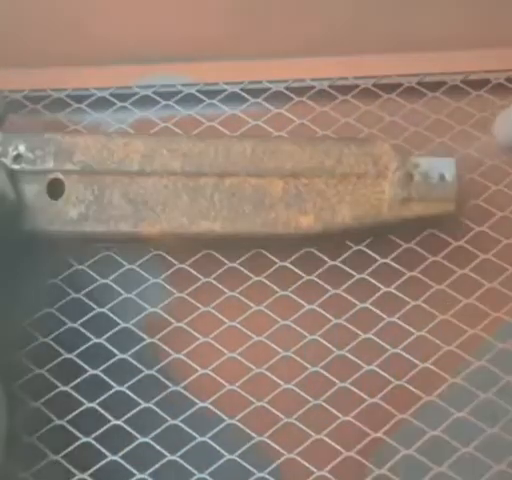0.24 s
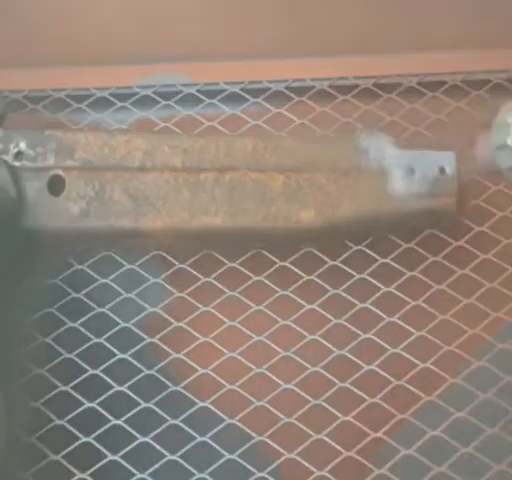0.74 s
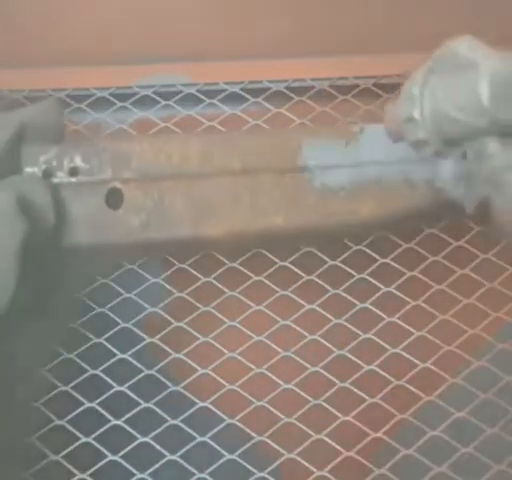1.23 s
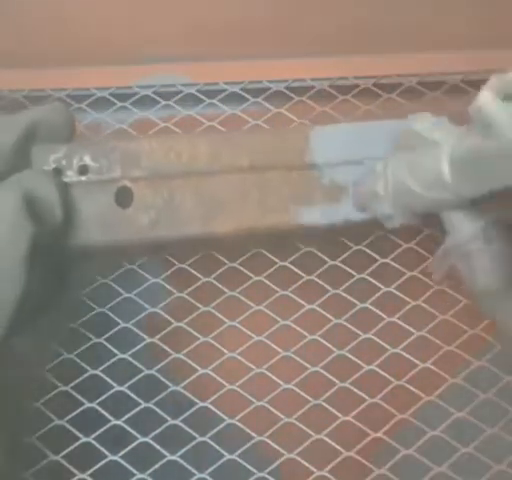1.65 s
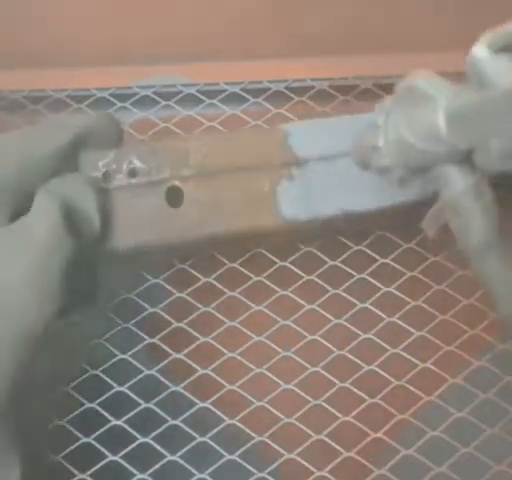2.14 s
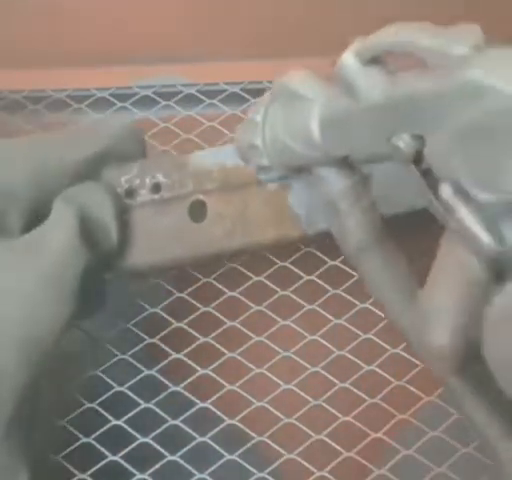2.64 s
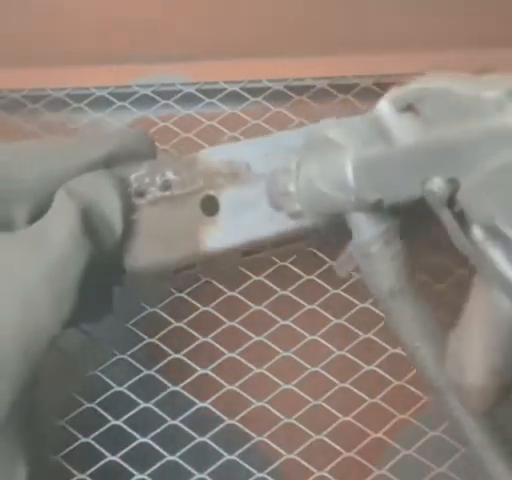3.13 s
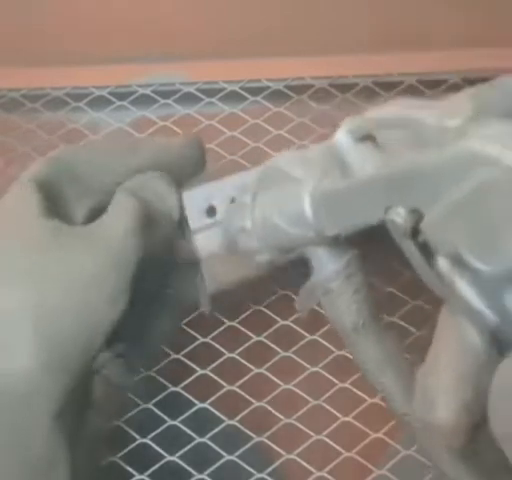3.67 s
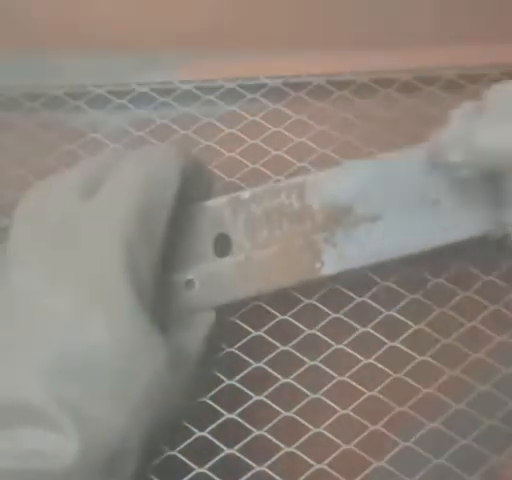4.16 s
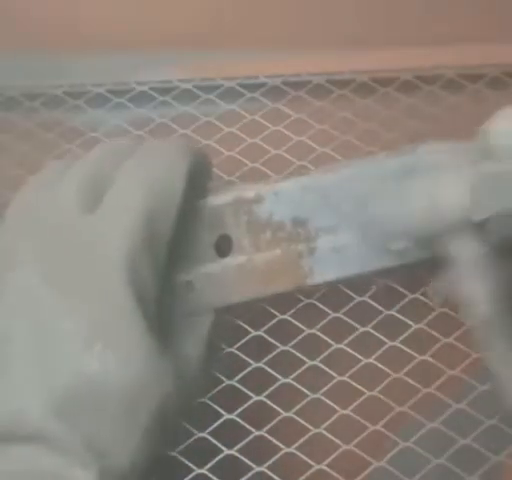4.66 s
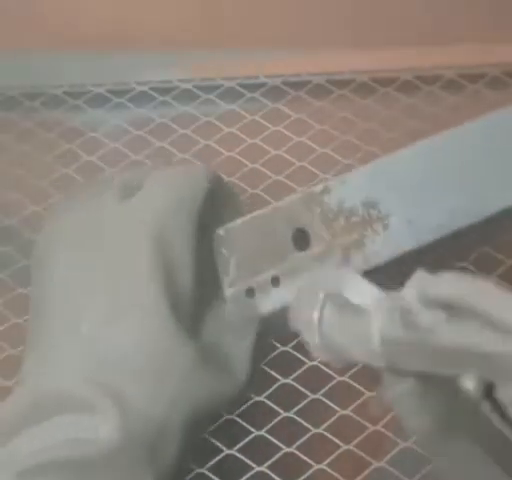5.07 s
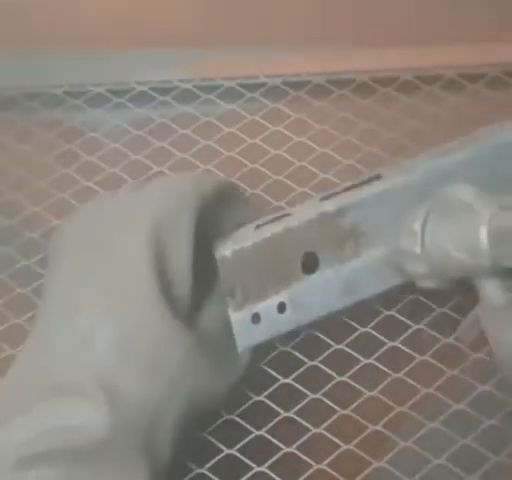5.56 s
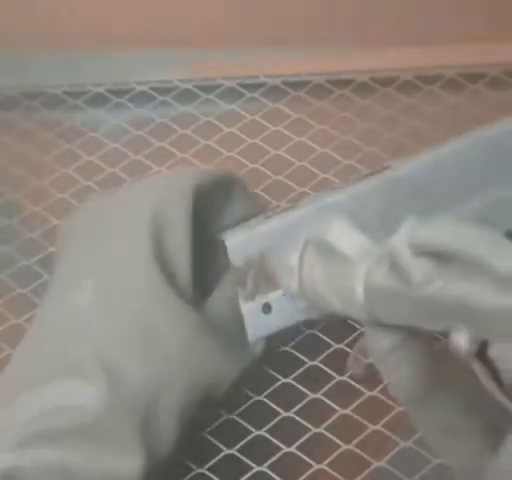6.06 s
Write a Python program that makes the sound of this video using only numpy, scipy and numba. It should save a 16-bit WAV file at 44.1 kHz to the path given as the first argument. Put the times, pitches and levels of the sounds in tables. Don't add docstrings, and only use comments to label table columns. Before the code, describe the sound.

A blast gun runs continuously in a sheet-metal cabinet, heard close through one camera microphone, identical in both channels. From 0 s there is a loud, hollow, boxy air roar with a bright, grainy hiss of abrasive on steel. At about 0.5 s the level drops sharply, leaving thinner, subdued noise that creeps back from roughly 1 s and is full again near 1.8 s. The jet throbs and flickers unevenly as it sweeps the part, while a fuzzy, breathy nozzle tone around 1.7 kHz swells and fades inside it. At 3.5 s the part is turned: the colour shifts slightly and the tone locks into a steady thin whistle near 1.8 kHz, alternately pure and roughened, with a faint needle-like tone near 9.4 kHz. Around 4.75 s the part knocks once, softly and dully, on the mesh. Roar, hiss and whistle continue to the end at 6.3 s, the whistle weakening slightly.

```python
import sys
import numpy as np
from scipy import signal
from scipy.io import wavfile
from scipy.ndimage import uniform_filter1d
from numba import njit

SR = 44100
rng = np.random.default_rng(int(sys.argv[2]) if len(sys.argv) > 2 else 0)


def to_linear_factor(level_db):
    exponent = np.asarray(level_db, float) / 20
    return 10 ** exponent


def log_audio(samples):
    frames = np.atleast_2d(samples).T
    limited = np.clip(frames, -1, 1)
    pcm = np.round(limited * 32767).astype(np.int16)
    wavfile.write(sys.argv[1], SR, pcm)


N = 277830
T = np.arange(N) / SR
HOP = 128
TURN_S = 3.515

# (time [s], body level [dB], bass re body [dB])
ROAR_LEVELS = [(0.0, -26, -24), (0.05, -27.5, -19), (0.42, -27.5, -18), (0.46, -28, -28), (0.52, -40, -14),
               (0.59, -34.5, -22), (0.65, -39, -14), (0.75, -34.5, -20), (0.84, -33.5, -15.5),
               (1.35, -28.5, -21), (1.58, -27.5, -16), (1.61, -31, -14), (1.63, -22, -24),
               (1.68, -30.5, -11), (1.7, -27, -14), (1.79, -23, -21), (1.9, -26.5, -17), (2.02, -24, -18),
               (2.07, -24, -23), (2.25, -26, -16), (2.32, -21.5, -21), (2.33, -26, -17), (2.86, -26.5, -17),
               (2.88, -26.5, -19), (2.95, -28.5, -16), (2.96, -27.5, -19), (3.33, -25, -18.5),
               (3.35, -28, -15), (3.37, -25, -17), (3.53, -26, -21), (3.54, -21.5, -20), (3.58, -27.5, -22),
               (3.65, -25, -23), (3.67, -26.5, -16), (3.79, -25.5, -21), (3.96, -27, -16),
               (4.0, -24.5, -25), (4.03, -33, -16), (4.05, -24.5, -22), (4.07, -28, -17),
               (4.63, -26, -19.5), (4.76, -26.5, -7.5), (4.79, -26.5, -17), (4.91, -29, -12),
               (4.96, -23.5, -18), (5.05, -29.5, -16), (5.07, -27.5, -23), (5.12, -27, -17),
               (5.56, -28.5, -15.5), (5.61, -28, -14), (5.65, -29.5, -20), (5.69, -29, -18),
               (5.79, -27.5, -18), (6.3, -27.5, -19)]
# (frequency [Hz], density [dB per Hz])
ROAR_SPECTRA = [
    [(15, -63), (25, -31), (123, -20), (220, -13), (325, -16.5), (735, -9.5), (965, -5), (1320, -11.5), (1730, -9.5), (1870, -12), (2600, -15), (3380, -48), (5720, -120)],
    [(15, -70), (25, -37), (229, -19.5), (365, -20.5), (750, -12), (826, -10), (1220, -14), (1660, -18), (1760, -6.5), (1940, -18), (2600, -33), (3380, -57), (5720, -120)],
]
# (frequency [Hz], width [Hz], height over roar [dB])
CABINET_MODES = [
    [(235, 50, 6), (978, 38, 8), (1226, 50, 7), (1438, 78, 6.5)],
    [(239, 75, 3.5), (840, 38, 6), (984, 35, 7.5), (1215, 44, 8), (1466, 97, 6)],
]
KNOCK = 4.745, -33, .012
# (time [s], level [dB])
MOAN_LEVELS = [(0.0, -43), (0.19, -42), (0.43, -37), (0.49, -36), (0.52, -51), (0.93, -45), (1.07, -39),
               (1.26, -45), (1.43, -38), (1.46, -39.5), (1.68, -40), (1.88, -30), (2.01, -35), (2.09, -31),
               (2.3, -34), (2.36, -28), (2.49, -37), (2.53, -32), (2.68, -36.5), (2.79, -32), (3.04, -31),
               (3.1, -47), (3.19, -33.5), (3.39, -45), (3.5, -35)]
# (time [s], pitch [Hz], level [dB], turbulence [0-1])
WHISTLE_TRACK = [(3.515, 1805, -26, 0.34), (3.8, 1802, -27, 0.53), (4.05, 1794, -27, .5),
                 (4.12, 1777, -25.5, .15), (4.42, 1806, -25, 0), (4.5, 1795, -25, .45),
                 (4.8, 1800, -25, 0.53), (4.9, 1797, -26, .3), (5.25, 1803, -25.5, 0.33),
                 (5.32, 1815, -23, 0), (5.65, 1793, -26, 0.04), (5.75, 1815, -28.5, 0.48),
                 (6.0, 1792, -27.5, 0.39), (6.3, 1804, -31, 0.62)]
# (time [s], pitch [Hz], level [dB])
THIN_TRACK = [(3.52, 9379, -47), (3.65, 9378, -41), (3.75, 9376, -46), (3.81, 9379, -41), (3.87, 9420, -46),
              (4.78, 9377, -47), (4.8, 9470, -38), (5.11, 9380, -42), (5.24, 9400, -45), (5.62, 9420, -41),
              (5.69, 9400, -43), (6.3, 9400, -41)]
# (time [s], scour [dB], spray [dB], fizz [dB], air [dB]), low band to high
JET_LEVELS = [(0.0, -35, -32, -33, -32), (0.05, -33.5, -31, -31, -32), (0.16, -34, -30, -32, -34),
              (0.19, -32, -28.5, -30, -31), (0.28, -33.5, -32, -33, -34), (0.39, -32.5, -28, -28.5, -30),
              (0.42, -34, -29, -34, -33), (0.47, -32, -28.5, -30, -30), (0.51, -44, -43, -46, -46),
              (0.54, -44, -44, -47, -40), (0.59, -46, -47, -44, -45), (0.77, -43, -40.5, -44, -43),
              (1.02, -41.5, -40, -42, -40), (1.07, -38, -31.5, -41, -37), (1.12, -40, -37.5, -41.5, -40),
              (1.23, -38.5, -37.5, -37, -38), (1.45, -35, -36, -37.5, -35), (1.49, -36.5, -36.5, -38, -36),
              (1.68, -35.5, -32.5, -33, -34), (1.75, -33, -33.5, -35, -34), (1.79, -37, -30.5, -37, -27),
              (1.82, -35.5, -35, -36, -35), (1.98, -33, -32.5, -32, -33), (2.05, -34, -36, -33, -34),
              (2.28, -35, -32, -31, -33), (2.45, -35.5, -33, -30, -32), (2.58, -35.5, -37, -35, -34),
              (2.7, -34.5, -30, -29, -32), (2.75, -38, -32.5, -29, -29), (2.79, -34, -33, -26.5, -32),
              (2.82, -35.5, -35, -33, -36), (2.95, -37.5, -35, -29, -32), (3.35, -35, -36.5, -31.5, -30),
              (3.37, -35.5, -34, -27.5, -30), (3.45, -34.5, -34.5, -31.5, -29), (3.63, -32, -33, -35, -30),
              (3.65, -34, -29, -34, -31), (3.74, -36, -34, -35.5, -30), (3.81, -34, -33.5, -34.5, -32),
              (3.88, -32, -30.5, -33, -29), (3.96, -34.5, -38.5, -36, -31), (4.02, -35.5, -30, -31.5, -32),
              (4.14, -37, -39, -38, -34.5), (4.23, -37, -34, -37, -31.5), (4.63, -36.5, -36, -35.5, -33),
              (4.65, -36.5, -32, -32, -30), (4.77, -35.5, -36, -36, -33), (4.79, -35, -32.5, -31, -30),
              (4.91, -36.5, -35, -31.5, -31), (4.95, -36, -37, -34, -35), (5.0, -37, -31, -36, -29),
              (5.03, -37, -36.5, -29, -29), (5.14, -36.5, -34, -34.5, -34), (5.21, -34.5, -34, -32, -30),
              (5.25, -35.5, -36.5, -36, -32), (5.37, -35.5, -35.5, -35, -31), (5.44, -38, -33.5, -29, -32),
              (5.53, -39, -35.5, -33.5, -32), (5.56, -36.5, -33, -34, -32),
              (5.82, -37.5, -36.5, -32, -32.5), (5.89, -37.5, -32.5, -30.5, -29),
              (5.95, -37, -37.5, -33, -32.5), (6.05, -37.5, -31.5, -28.5, -28), (6.07, -38, -39, -34, -32),
              (6.19, -34.5, -33, -32, -29), (6.26, -42, -35, -30.5, -34), (6.3, -38, -37, -32, -32)]
JET_BAND_EDGES_HZ = 2100, 4000, 7300, 10000
# (frequency [Hz], density [dB per Hz])
JET_SPECTRA = [
    [(1180, -32), (2000, -0.5), (2510, -9.5), (3430, -6), (4080, -7.5), (5630, -4), (6470, -7.5), (8700, -8), (10100, -4.5), (13200, 7.5), (14500, 4), (15200, 15), (16000, -20.5)],
    [(1180, -30), (2000, 5), (2260, -2.5), (3580, -4), (4080, -3.5), (4570, -4.5), (5880, -3), (7910, -5.5), (9090, -2.5), (10100, -3.5), (13600, 5), (15100, 3), (16000, -31)],
]
# (frequency [Hz], width [Hz], height over jet [dB])
STEEL_MODES = [
    [(5100, 100, 0.5), (5600, 140, 0), (7170, 60, 5), (8530, 200, 5.5), (9060, 130, 6.5), (13500, 200, 4)],
    [(4100, 160, 2), (4870, 160, 5), (5880, 160, 3), (8600, 77, 6), (9120, 60, 3), (9570, 100, -4), (11900, 130, -2), (13450, 400, -0.5)],
]


def evened(x):
    return x / np.sqrt(np.mean(abs(x) ** 2) + 1e-20)


def curve(rows, t_s):
    row_s, *columns = np.transpose(rows)
    return [np.interp(t_s, row_s, column) for column in columns]


def complex_noise():
    return rng.standard_normal((N, 2)) @ [1, 1j]


def spectrum_db(points, modes, hz):
    point_hz, point_db = np.transpose(points)
    smooth_db = np.interp(np.log(hz + 1), np.log(point_hz + 1), point_db)
    lift = 1 + sum((to_linear_factor(height_db) ** 2 - 1) / (1 + (2 * (hz - mode_hz) / width_hz) ** 2)
                   for mode_hz, width_hz, height_db in modes)
    return smooth_db + 10 * np.log10(np.maximum(lift, .01))


def turbulence_noise(spectra, modes, edges_hz, levels_db, patchy_db, flicker_db, size=1024):
    hz = np.fft.rfftfreq(size, 1 / SR)
    t_s = np.arange(N // HOP + 9) * HOP / SR
    real, imag, patches = rng.standard_normal((len(t_s), len(hz), 3)).T
    patches = uniform_filter1d(patches, size=14, axis=0)
    patches = evened(uniform_filter1d(patches, size=20, axis=1))
    flicker = evened(uniform_filter1d(rng.standard_normal(len(t_s)), size=6))

    before, after = (to_linear_factor(spectrum_db(s, m, hz))[:, None] for s, m in zip(spectra, modes))
    shape = np.where(t_s < TURN_S, before, after)
    above_edge = [1 / (1 + (edge / (hz + 1)) ** 16) for edge in edges_hz] + [0 * hz]
    power = 0
    for k, db in enumerate(levels_db(t_s)):
        band = np.sqrt(above_edge[k] - above_edge[k + 1])[:, None] * shape
        power = power + band ** 2 / (band ** 2).sum(0) * to_linear_factor(db) ** 2

    unsteady = to_linear_factor(patchy_db * patches + flicker_db * flicker)
    frames = (real + 1j * imag) * np.sqrt(power) * unsteady
    x = signal.istft(frames, nperseg=size, noverlap=size - HOP)[1][:N]
    return x * np.sqrt(size / HOP) / 2


def cabinet_roar():
    def levels_db(t_s):
        body_db, bass_db = curve(ROAR_LEVELS, t_s)
        return body_db + bass_db + 0.19, body_db + 0.5, body_db - 90
    return turbulence_noise(ROAR_SPECTRA, CABINET_MODES, (20, 400, 2200), levels_db,
                            patchy_db=1.0, flicker_db=0.84, size=2048)


def mesh_knock():
    at_s, level_db, half_s = KNOCK
    u = (T - at_s) / half_s
    puff = evened(signal.lfilter([1], [1, -.96], rng.standard_normal(N)))
    return to_linear_factor(level_db) * np.exp(-u ** 2) * (.8 * u + 0.75 * puff)


def nozzle_moan():
    centre_hz, width_hz = 1720, 41
    decay = np.exp(-np.pi * width_hz / SR)
    envelope = signal.lfilter([1], [1, -decay], complex_noise())
    tone = evened((envelope * np.exp(2j * np.pi * centre_hz * T)).real)
    level_db = curve(MOAN_LEVELS, T)[0] + 1.8
    return tone * to_linear_factor(level_db) * (T < TURN_S)


@njit
def locked_swing(kicks, grip):
    swing, out = 1 + 0j, np.empty_like(kicks)
    for i in range(len(kicks)):
        swing += grip * (1 - abs(swing) ** 2) * swing + kicks[i]
        out[i] = swing
    return out


def nozzle_whistle():
    main_hz, main_db, turbulence = curve(WHISTLE_TRACK, T)
    gusts = evened(signal.lfilter([1], [1, -.995], complex_noise()))
    swing = locked_swing(0.0027 * turbulence * gusts, 90. / SR)
    main = to_linear_factor(main_db) * (swing * np.exp(2j * np.pi * np.cumsum(main_hz) / SR)).real

    thin_hz, thin_db = curve(THIN_TRACK, T)
    wander_hz = 5.9 * evened(uniform_filter1d(rng.standard_normal(N), size=600))
    thin = to_linear_factor(thin_db) * np.sin(2 * np.pi * np.cumsum(thin_hz + wander_hz) / SR)

    onset = np.clip((T - TURN_S) / .008, 0, 1)
    return np.sqrt(2) * (main + thin) * onset


def grit_jet():
    hiss = turbulence_noise(JET_SPECTRA, STEEL_MODES, JET_BAND_EDGES_HZ, lambda t_s: curve(JET_LEVELS, t_s),
                            patchy_db=1.23, flicker_db=0.6)
    grit = evened(uniform_filter1d(rng.standard_normal(N), size=40))
    grain = evened(to_linear_factor(0.71 * grit))
    return to_linear_factor(1.84) * hiss * grain


def scene():
    mix = cabinet_roar() + mesh_knock() + nozzle_moan() + nozzle_whistle() + grit_jet()
    return np.tile(mix, (2, 1))


def low_pass(x):
    return signal.sosfilt(signal.butter(12, 17060, fs=SR, output="sos"), x)


def record(dry):
    return low_pass(dry)


dry = scene()
out = record(dry)
log_audio(out)
```